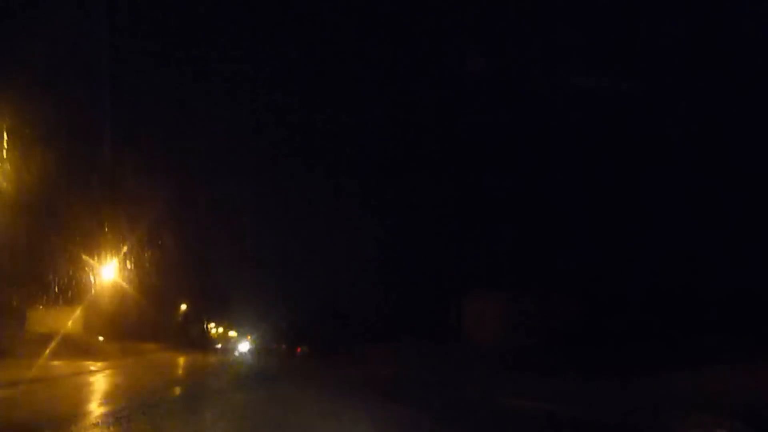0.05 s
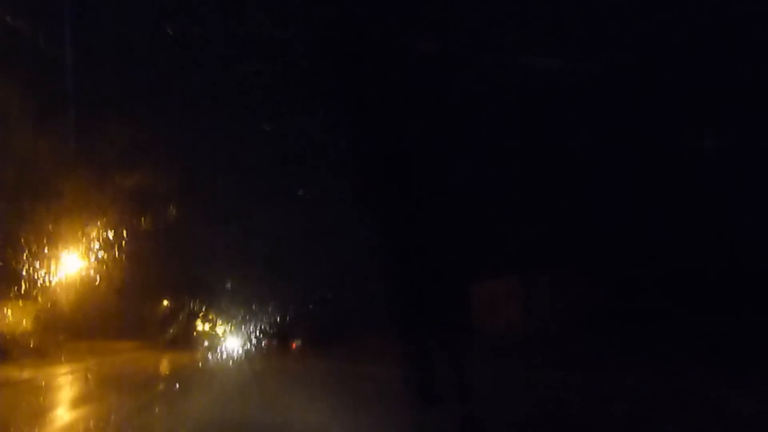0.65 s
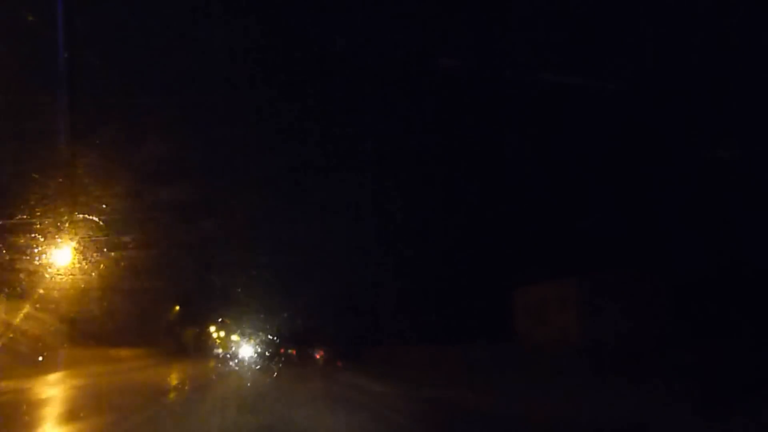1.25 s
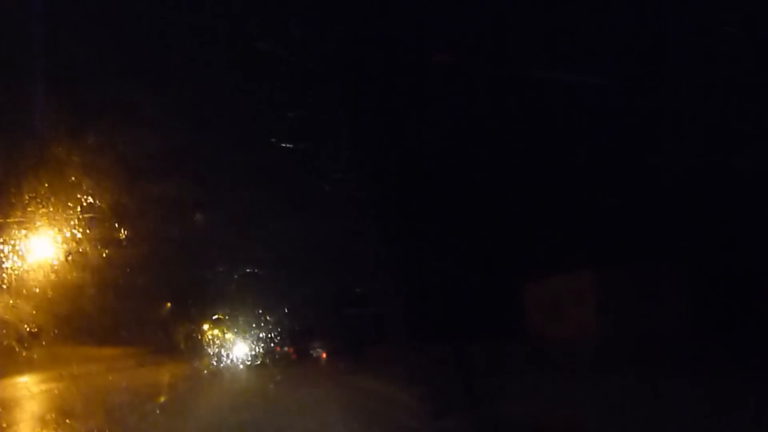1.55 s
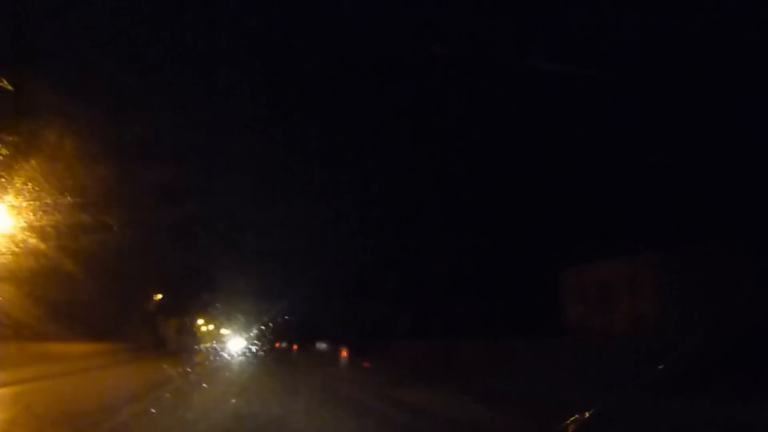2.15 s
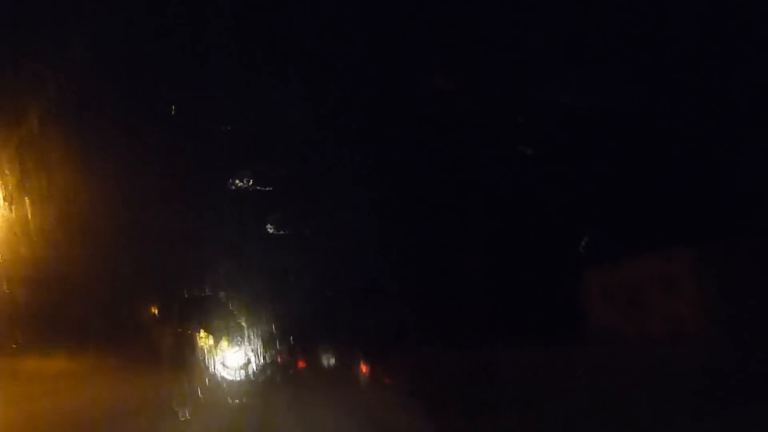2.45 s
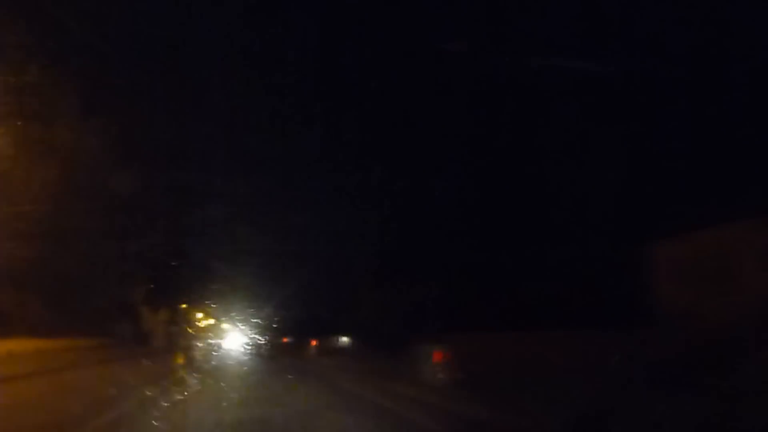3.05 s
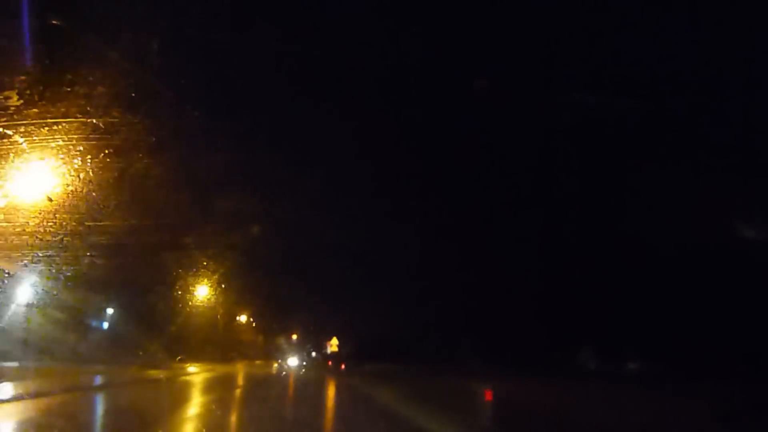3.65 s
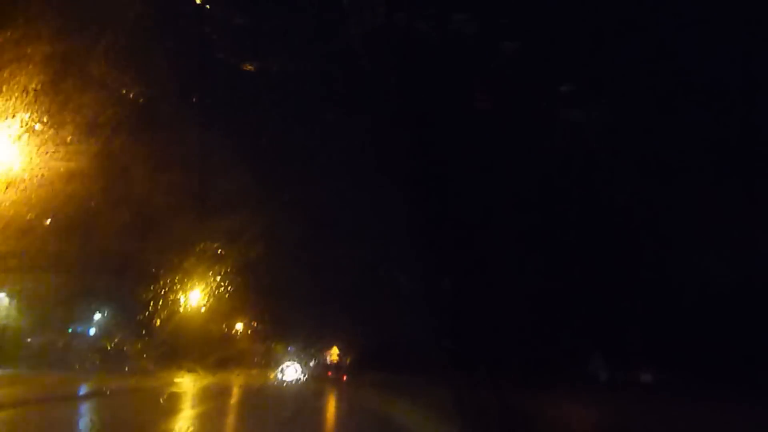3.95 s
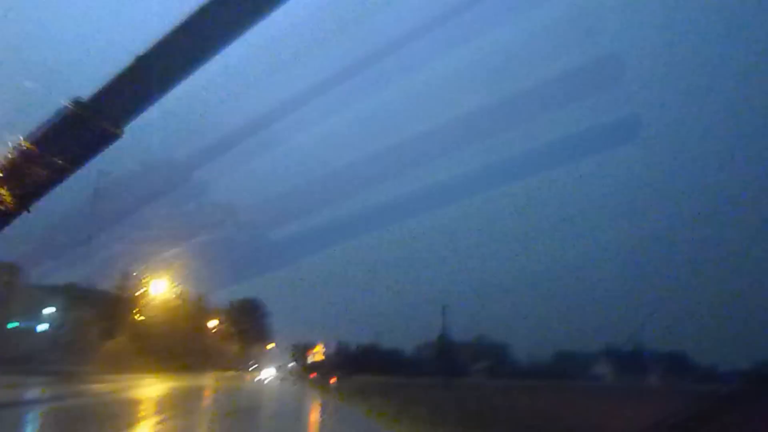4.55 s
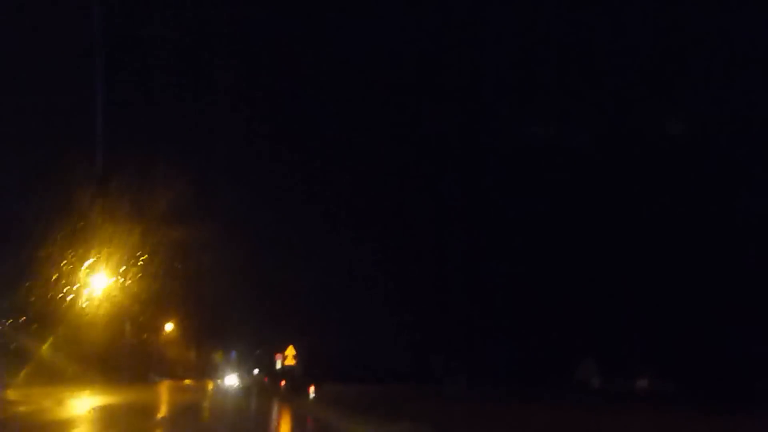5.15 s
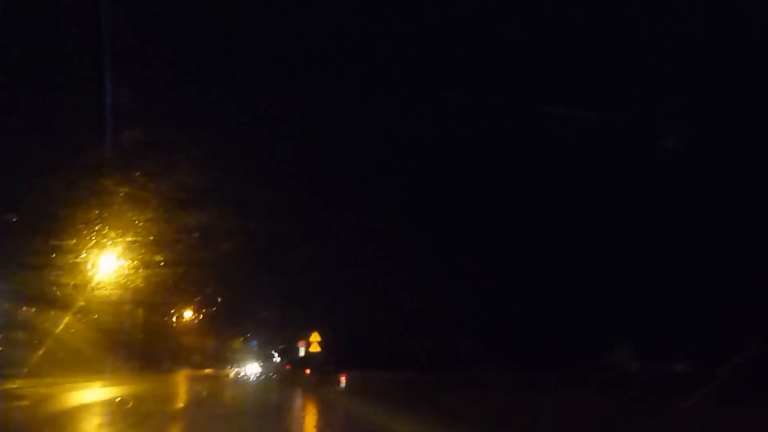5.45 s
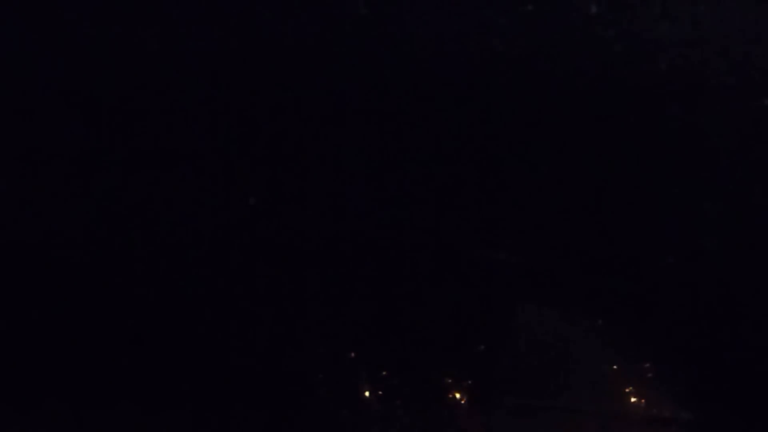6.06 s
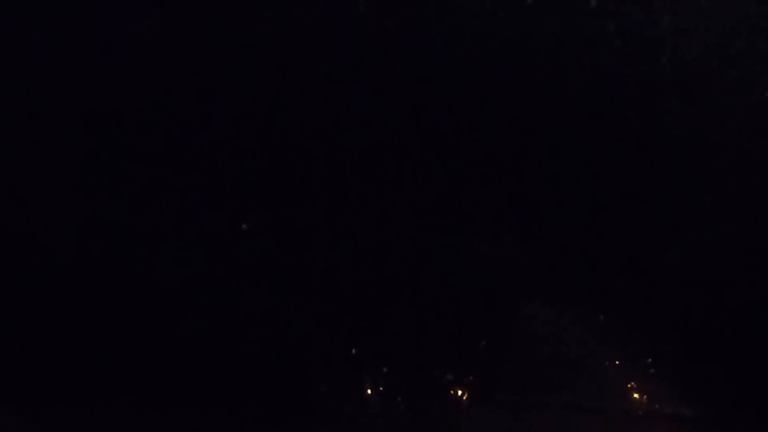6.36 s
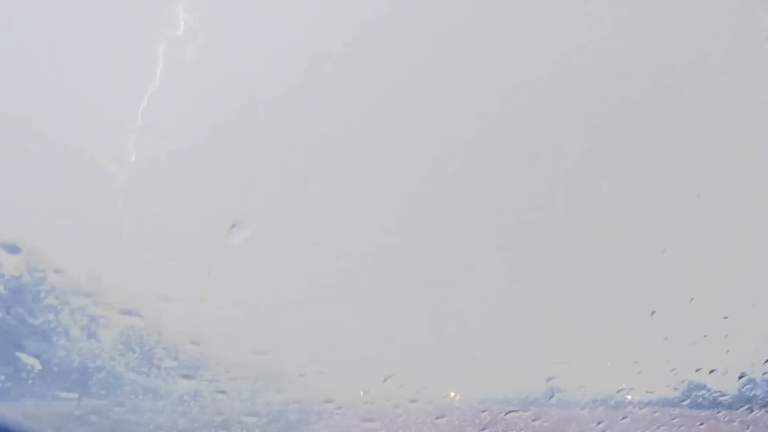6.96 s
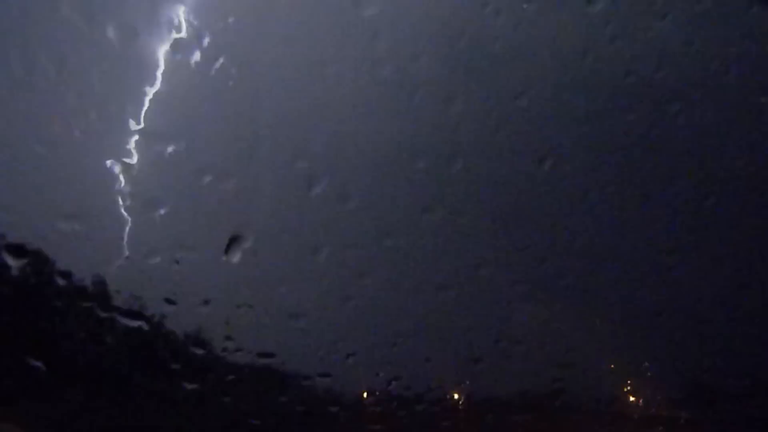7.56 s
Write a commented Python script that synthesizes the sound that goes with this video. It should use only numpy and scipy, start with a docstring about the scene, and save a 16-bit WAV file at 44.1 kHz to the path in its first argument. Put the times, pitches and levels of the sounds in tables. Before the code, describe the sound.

Inside a car, a downpour drums over tyre rumble and a droning engine, switching abruptly to softer rain tapping the parked car.

```python
"""Downpour inside a car.

First the car drives: drops hammer the windscreen and roof over the rumble of tyres on the
wet road and a slowly quickening engine, whose octave booms in the cabin's air resonance.
Then the scene cuts to a standing car, where lighter rain patters on the roof and glass.
Each drop is a brief crack of a panel followed by the cabin's short answer."""
import sys
import numpy as np
from scipy import signal
from scipy.fft import rfft, irfft, next_fast_len
from scipy.io import wavfile
from scipy.ndimage import map_coordinates

SR = 44100
rng = np.random.default_rng(int(sys.argv[2]) if len(sys.argv) > 2 else 0)


def file_out(sig):
    """Save sig as 16-bit WAV at sys.argv[1]."""
    # one column per channel
    cols = np.atleast_2d(sig).T
    # limit, then scale
    lim = np.clip(cols, -1, 1)
    pcm = np.round(lim * 32767).astype(np.int16)
    wavfile.write(sys.argv[1], SR, pcm)


N = 343539


def amp(db):
    """Decibels to gain."""
    return 10 ** (np.asarray(db) / 20)


def unit(x):
    """Scale to rms 1."""
    return x / np.sqrt(np.mean(x ** 2) + 1e-20)


def along(points, hz):
    """(Hz, value) points read on a log axis."""
    points_hz, values = np.transpose(points)
    return np.interp(np.log(hz + 1), np.log(points_hz + 1), values)


def curves(rows):
    """One value per sample for each column after the time."""
    times_s, *columns = np.transpose(rows)
    return [np.interp(np.arange(N) / SR, times_s, column) for column in columns]


def wobble(rate_hz):
    """Smooth random curve, rate_hz knots a second."""
    knots = rng.standard_normal(int(N * rate_hz / SR) + 4)
    return map_coordinates(knots, [np.arange(N) * rate_hz / SR])


def swells(rows):
    """Sum of bell curves. Each row: centre in seconds, half-width in seconds, height."""
    t = np.arange(N) / SR
    return sum(height * np.exp(-((t - at_s) / width_s) ** 2) for at_s, width_s, height in rows)


def filtered(x, response):
    """Apply a complex frequency response."""
    n = x.shape[-1]
    size = 2 * next_fast_len(n // 2 + SR // 20)
    return irfft(rfft(x, size) * response(np.fft.rfftfreq(size, 1 / SR)), size)[..., :n]


def coloured(x, spectrum):
    """Causal filter through (Hz, dB) points, so attacks stay sharp."""
    def response(hz):
        cepstrum = irfft(np.log(amp(along(spectrum, hz))))
        half = len(cepstrum) // 2
        return np.exp(rfft(np.r_[cepstrum[0], 2 * cepstrum[1:half]], 2 * half))
    return filtered(x, response)


# Stereo width in the cabin. Each row: frequency in Hz, side minus mid in dB.
CABIN_WIDTH = [(60, -28), (170, -33), (350, -24), (700, -14.7), (1400, -7), (2300, -2), (3300, -2.2),
               (5000, -3.6), (7000, -6.5), (9500, -10)]


def stereo(pair):
    """Two unrelated signals become left and right: alike in the bass, apart in the treble."""
    def mid_side_gains(hz):
        angle = np.arctan(amp(along(CABIN_WIDTH, hz)))
        return np.array([np.cos(angle), np.sin(angle)])
    mid, side = filtered(pair, mid_side_gains)
    return np.array([mid + side, mid - side])


def impact(crack_t60_s, cabin_t60_s, cabin_db):
    """One drop at one spot: the panel cracks in its own register, the cabin answers briefly."""
    t = np.arange(SR // 10) / SR
    envelope = amp(-60 * t / crack_t60_s) + amp(cabin_db - 60 * t / cabin_t60_s)
    tint = [(hz, 2.1 * rng.normal()) for hz in (1300, 2000, 2800, 3900, 5600)]
    ring = coloured(rng.standard_normal((2, len(t))) * envelope, tint)
    return ring / np.linalg.norm(ring)


def rain(per_s, spread_db, spots=40, **decay):
    """Drops of random size fall at random times on the spots of a panel."""
    falls = rng.random(N) < per_s / SR
    sizes = amp(spread_db * np.minimum(rng.standard_normal(N), 2.4))
    landing_spot = rng.integers(spots, size=N)
    patter = np.zeros((2, N))
    for spot in range(spots):
        hits = falls * sizes * (landing_spot == spot)
        patter += signal.oaconvolve(hits[None], impact(**decay), axes=1)[:, :N]
    return stereo(patter - patter.mean(axis=1, keepdims=True))


def fat_drops(rows, colour, focus_db, attack_s, **decay):
    """Single large drops, each ringing around its own pitch; level is rms over attack_s."""
    out = np.zeros((2, N + SR))
    for start_s, hz, db in rows:
        focus = [(hz / 2, -focus_db), (hz, 0), (hz * 2, -focus_db), (hz * 4, -2 * focus_db)]
        hit = coloured(colour(stereo(impact(**decay))), focus)
        attack_rms = hit[:, :round(attack_s * SR)].std()
        out[:, round(start_s * SR):][:, :hit.shape[1]] += amp(db) * hit / attack_rms
    return out[:, :N]


# Road noise spectra. Each row: frequency in Hz, relative density in dB.
SHAKE_SPECTRUM = [(10, -5), (22, -0.5), (35, -7.5), (52, 3), (75, -2), (110, -0.5), (400, -100)]
TYRE_SPECTRUM = [(55, -26.5), (85, -5.5), (105, 0.5), (150, 6.5), (180, -1), (230, -3.5), (290, -1),
                 (400, -5), (520, -13), (900, -16.5), (3000, -110)]
THUD_SPECTRUM = [(30, -21), (60, 0), (95, 3.5), (125, 4.5), (160, -7), (260, -3.5), (500, -54),
                 (2000, -110)]
SURGE_SPECTRUM = [(120, -32), (200, -3.5), (285, 2.5), (340, -1.5), (420, -9.5), (600, -22.5), (1500, -77)]
# Patches of road. Each row: centre in seconds, half-width in seconds, level in dB.
ROUGH_PATCHES = [(3.05, .06, -21.5), (3.135, .025, -24), (4.26, .015, -21), (4.42, .05, -23),
                 (4.53, .035, -23), (4.95, .025, -22), (5.8, .04, -26)]
WET_PATCHES = [(3.42, .07, -30), (3.6, .08, -30), (4.48, .06, -27), (4.9, .06, -31.5), (5.3, .06, -30),
               (5.7, .12, -31.5)]


def road():
    """Body shake and tyre roar grow with speed; rough patches thud and wet ones surge."""
    def rumble(spectrum):
        return unit(coloured(stereo(rng.standard_normal((2, N))), spectrum))

    def bursts(rows):
        return swells([(at_s, width_s, amp(db)) for at_s, width_s, db in rows])

    pace = speed()
    shake = amp(-34 + 3.5 * pace + 2.3 * wobble(5.01)) * rumble(SHAKE_SPECTRUM)
    roar = amp(-28.5 + 2.5 * pace + 1.2 * wobble(12)) * rumble(TYRE_SPECTRUM)
    thuds = bursts(ROUGH_PATCHES) * rumble(THUD_SPECTRUM)
    surges = bursts(WET_PATCHES) * rumble(SURGE_SPECTRUM)
    return shake + roar + thuds + surges


# Firing tone. Each row: time in seconds, firing rate in Hz, level in dB.
FIRING_TONE = [(0, 63.14, -28), (0.8, 62.9, -25), (1.7, 63.92, -27.5), (3.1, 64.94, -28),
               (3.28, 67.36, -31), (3.45, 68.73, -26.5), (4.1, 70.06, -28.5), (4.5, 69.75, -29),
               (5.85, 69.86, -26.5)]
# Weak engine orders. Each row: multiple of the firing rate, dB at lowest speed, dB at full speed.
WEAK_ORDERS = [(.5, -48, -45), (1.5, -55, -43), (3, -41, -36.5), (4, -45.5, -38), (4.23, -48.5, -38)]
# Swells and sags of the boom. Each row: centre in seconds, half-width in seconds, gain in dB.
BOOM_SWINGS = [(.03, .06, -5), (.26, .08, 5), (.7, .2, 2.5), (1.12, .1, 2.5), (2.7, .035, 5),
               (2.82, .04, -4), (3.26, .06, -6), (3.45, .09, 3), (3.64, .09, 4), (4.02, .055, 8),
               (4.16, .04, -5)]


def engine(cabin_hz=130.3, cabin_width_hz=11.6, boom_db=-27):
    """The firing tone hums; its octave booms until it climbs out of the cabin's air resonance."""
    firing_hz, firing_db = curves(FIRING_TONE)
    pace = speed()
    phase = 2 * np.pi * np.cumsum(firing_hz) / SR

    def order(multiple, db, roughness):
        flutter = 1 + roughness * (wobble(12) + 1j * wobble(12))
        return -np.sqrt(2) * amp(db) * np.real(flutter * np.exp(1j * multiple * phase))

    detuning = (2 * firing_hz - cabin_hz) / (cabin_width_hz / 2)
    octave_db = boom_db - 10 * np.log10(1 + detuning ** 2) + swells(BOOM_SWINGS)
    hum = order(1, firing_db, roughness=.21)
    boom = order(2, octave_db, roughness=.2 + .25 * pace)
    weak = sum(order(multiple, slow_db + pace * (fast_db - slow_db), roughness=.29)
               for multiple, slow_db, fast_db in WEAK_ORDERS)
    return hum + boom + weak


def speed():
    """The car's pace follows the engine: 0 at its slowest, 1 at full speed."""
    firing_hz, _ = curves(FIRING_TONE)
    return (firing_hz - firing_hz.min()) / np.ptp(firing_hz)


# Drops ringing on the bodywork. Each row: start in seconds, pitch in Hz, peak in dB.
STEEL_PLINKS = [(6.122, 2750, -40), (6.213, 1620, -31.5), (6.59, 2950, -40), (6.693, 2900, -42),
                (7.127, 2930, -38.5), (7.407, 1450, -34), (7.445, 2650, -39), (7.607, 2720, -38)]


def plinks(t60_s):
    """Each drop wakes one short-lived mode of the thin steel."""
    out = np.zeros((2, N + SR))
    t = np.arange(SR // 8) / SR
    for start_s, hz, db in STEEL_PLINKS:
        channel_phase = rng.normal(0, .28, (2, 1))
        ring = amp(db - 60 * t / t60_s) * np.sin(2 * np.pi * hz * t + channel_phase)
        out[:, round(start_s * SR):][:, :len(t)] += ring
    return out[:, :N]


# Roof and cabin modes. Each row: centre in Hz, bandwidth in Hz, gain in dB.
ROOF_MODES = [(66, 6, 2), (184, 40, 1.5), (329, 43, 6), (490, 76, 5.5), (702, 116, 3), (1095, 150, -3),
              (1396, 100, 2), (1627, 86, 2), (2520, 460, -4.5), (4800, 1770, -17)]


def roof_panel(x):
    """The roof and the cabin under it ring in modes of alternating sign."""
    def response(hz):
        return sum((-1) ** k * amp(db) * 1j * hz * width_hz / (mode_hz**2 - hz**2 + 1j * hz * width_hz)
                   for k, (mode_hz, width_hz, db) in enumerate(ROOF_MODES))
    return filtered(x, response)


# Rain strength, car standing. Each row: time in seconds, roof and windscreen in relative dB.
SHOWER_STRENGTH = [(5.9, -39, -45), (6.4, -41, -48.5), (6.8, -39.5, -48), (7.79, -41, -48)]
# Panel spectra, car standing. Each row: frequency in Hz, relative density in dB.
SHOWER_ROOF_SPECTRUM = [(22, -32), (35, -13), (45, -20), (64, -0.5), (85, -10), (120, -5), (177, -1),
                        (216, -7), (330, -3.5), (389, -8), (523, -5.5), (626, -11), (800, -5.5), (989, -10),
                        (1590, -16), (2000, -13.5), (2600, -46), (4400, -120)]
SHOWER_GLASS_SPECTRUM = [(400, -23), (1300, -10), (1900, -1), (2200, -1.5), (2700, 0.5), (3000, -7),
                         (3250, -6.5), (4500, -11), (6000, -10.5), (7200, -23), (9000, -32), (11000, -40)]
# Fat drops on the roof. Each row: start in seconds, pitch in Hz, level in dB.
ROOF_PLOPS = [(5.945, 1400, -41.5), (5.983, 800, -39), (6.029, 850, -37), (6.064, 500, -39),
              (6.117, 900, -38.5), (6.241, 600, -35.5), (6.49, 480, -39), (6.555, 800, -36),
              (6.671, 220, -40), (6.689, 270, -39), (6.835, 480, -36.5), (7.275, 1050, -40.5),
              (7.391, 680, -36), (7.445, 300, -40), (7.541, 750, -35), (7.567, 700, -37)]


def shower():
    """On the standing car the drops are fewer and softer, and the roof's resonances come through."""
    roof_db, glass_db = curves(SHOWER_STRENGTH)
    taps = rain(per_s=700, spread_db=3, crack_t60_s=.024, cabin_t60_s=.11, cabin_db=-5)
    wash = rain(per_s=1500, spread_db=.5, crack_t60_s=.019, cabin_t60_s=.1, cabin_db=-5)
    ticks = rain(per_s=900, spread_db=4, crack_t60_s=.008, cabin_t60_s=.06, cabin_db=-10)
    roof_ring = amp(roof_db - 1.5) * unit(roof_panel(taps))
    roof_wash = amp(roof_db - 1) * unit(coloured(wash, SHOWER_ROOF_SPECTRUM))
    glass = amp(glass_db - 1.5) * unit(coloured(ticks, SHOWER_GLASS_SPECTRUM))
    plops = fat_drops(ROOF_PLOPS, roof_panel, focus_db=11, attack_s=.015,
                      crack_t60_s=.024, cabin_t60_s=.09, cabin_db=-9)
    return roof_ring + roof_wash + glass + plops + plinks(t60_s=.055)


# Lulls in the rain. Each row: centre in seconds, loss in dB.
RAIN_LULLS = [(.15, 5), (.29, 3.5), (.92, 2), (1.34, 0.5), (1.875, 3.5), (2.66, -1), (2.811, 3), (3.02, 2),
              (3.305, 4), (3.8, 6), (4.11, 3.5), (4.54, 3.5), (5.01, 5), (5.42, 2)]


def lull_loss_db(width_s=.022):
    """The rain falls away briefly in each lull."""
    return swells([(at_s, width_s, db) for at_s, db in RAIN_LULLS])


# Prominent spray ticks. Each row: start in seconds, relative level in dB.
SPRAY_BURSTS = [(.0938, -38), (.221, -41), (.63, -41), (.864, -40), (1.0421, -42), (1.23, -42),
                (1.7171, -42), (1.8109, -40), (1.957, -39), (3.4377, -41), (3.4646, -41), (3.6043, -41),
                (4.4135, -41), (4.4564, -42), (4.5611, -41), (5.1897, -41), (5.8312, -41)]
# Spray spectrum. Each row: frequency in Hz, relative density in dB.
SPRAY_SPECTRUM = [(1500, -40), (3500, -10), (5200, 0), (6300, -2), (7200, -6), (9000, -10), (11000, -18),
                  (13000, -24)]


def spray(tick_hz=6500):
    """Fast drops burst on the windscreen with tiny bright ticks: a few stand out, the rest prickle."""
    _, glass_db = curves(DOWNPOUR_STRENGTH)
    bright = lambda x: coloured(x, SPRAY_SPECTRUM)
    drops = rain(per_s=250, spread_db=3.5, spots=12, crack_t60_s=.004, cabin_t60_s=.03, cabin_db=-22)
    prickle = amp(glass_db - 21 - lull_loss_db()) * unit(bright(drops))
    bursts = [(start_s, tick_hz, db) for start_s, db in SPRAY_BURSTS]
    ticks = fat_drops(bursts, bright, focus_db=2, attack_s=.002,
                      crack_t60_s=.007, cabin_t60_s=.03, cabin_db=-20)
    return prickle + amp(1) * ticks


# Fat drops on the glass. Each row: start in seconds, pitch in Hz, relative level in dB.
GLASS_SPLATS = [(.042, 3800, -27), (.0936, 4200, -26.5), (.2208, 2500, -21.5), (.2554, 2400, -24.5),
                (.3627, 2900, -21.5), (.4972, 3800, -23), (.6301, 3100, -24.5), (.742, 2500, -26),
                (.8073, 4100, -26.5), (.8365, 2800, -23.5), (.8618, 2900, -20), (1.0421, 4800, -28),
                (1.1048, 3400, -21.5), (1.1968, 3300, -26), (1.314, 4400, -26.5), (1.3858, 1900, -28),
                (1.8159, 2700, -26.5), (1.9573, 4800, -25.5), (2.2065, 2900, -26), (2.365, 5000, -28.5),
                (2.4733, 3900, -27.5), (2.7044, 2300, -27.5), (2.7635, 2000, -27), (2.9256, 2400, -25.5),
                (2.956, 3500, -27.5), (3.1278, 3200, -29.5), (3.2696, 2300, -25.5), (3.7197, 3300, -24),
                (4.4565, 3900, -25), (4.561, 3400, -27), (4.6813, 2500, -28.5), (4.7053, 3200, -28),
                (4.8614, 2500, -26), (5.107, 3900, -31), (5.2936, 2700, -27), (5.8315, 5200, -28),
                (5.8482, 5200, -29.5), (5.8642, 2800, -30.5), (5.947, 3600, -40), (6.0298, 2900, -39.5),
                (6.1186, 2400, -40), (6.174, 4200, -43), (6.2413, 2200, -41.5), (6.2917, 4400, -44.5),
                (6.4858, 2000, -43), (6.5017, 2400, -43), (6.5563, 3400, -36), (6.5691, 2800, -40.5),
                (6.6913, 2200, -41.5), (6.7207, 2500, -43), (6.8395, 2500, -43), (6.939, 4500, -44),
                (7.2136, 3500, -43.5), (7.3423, 2000, -44), (7.4062, 3000, -42), (7.4456, 4200, -41),
                (7.541, 3400, -41), (7.632, 4500, -44.5), (7.714, 2200, -43)]


def splats(splash_delay_s=.008, splash_loss_db=7.5):
    """Fat drops smack the windscreen, moving or standing; part of each splashes down again."""
    glass = lambda x: coloured(x, WINDSCREEN_SPECTRUM)
    scatter = rng.random((len(GLASS_SPLATS), 2))
    splashes = [(start_s + splash_delay_s * (.5 + late), hz * 2 ** (up - .5), db - splash_loss_db)
                for (start_s, hz, db), (late, up) in zip(GLASS_SPLATS, scatter)]
    return amp(-.5) * fat_drops(GLASS_SPLATS + splashes, glass, focus_db=7, attack_s=.0035,
                                crack_t60_s=.021, cabin_t60_s=.06, cabin_db=-16)


# Rain strength, car moving. Each row: time in seconds, roof and windscreen in relative dB.
DOWNPOUR_STRENGTH = [(0, -27, -31), (0.72, -27.5, -30.5), (1.0, -29.5, -33), (1.45, -30.5, -34.5),
                     (2.2, -29.5, -33), (2.65, -31.5, -34.5), (3.55, -29, -34.5), (4.15, -30.3, -35.5),
                     (4.9, -31, -35), (5.3, -29, -34), (5.8, -30.0, -34)]
# Sheets of water slapping the car. Each row: centre in seconds, half-width in seconds, roof gain in dB.
WATER_SHEETS = [(.36, 0.044, 3), (1.12, 0.03, 4.5), (1.2, 0.028, 2.5), (1.72, 0.093, 2.5), (2.02, 0.087, 0),
                (2.46, 0.031, 2), (2.9, 0.023, 2), (3.1, 0.058, 0), (4.48, 0.037, 2.5), (5.28, 0.061, 1.5),
                (5.64, 0.07, 4)]
# Roof patter, deep roof drumming and glass spectra. Each row: frequency in Hz, relative density in dB.
ROOF_SPECTRUM = [(150, -46.5), (350, -0.5), (500, -0.5), (690, 3), (790, -2), (1050, -1), (1350, -2.5),
                 (1750, -5), (2300, -9), (4000, -39.5), (9000, -100)]
DRUM_SPECTRUM = [(90, -30.5), (165, -1.5), (260, -0.5), (370, -1), (520, -4.5), (1000, -45)]
WINDSCREEN_SPECTRUM = [(300, -49), (1000, -7.5), (1700, -6.5), (2200, -2.5), (2700, -0.5), (3600, -2.5),
                       (4500, -3), (5400, -6.5), (6300, -12), (7200, -19), (9000, -30), (11000, -39)]


def downpour(drum_db_per_rain_db=3.25, glass_sheet_share=.38):
    """The moving car runs into sheets of rain: dense drumming above, sharp spatter in front."""
    roof_rain_db, glass_rain_db = curves(DOWNPOUR_STRENGTH)
    patter = rain(per_s=2500, spread_db=2, crack_t60_s=.0092, cabin_t60_s=.085, cabin_db=-13.5)
    spatter = rain(per_s=2300, spread_db=4.7, crack_t60_s=.006, cabin_t60_s=.05, cabin_db=-13)
    sheets_db = swells(WATER_SHEETS)
    gusts_db = .46 * wobble(12) - lull_loss_db()
    clumps_db = wobble(35)  # drops arrive in clumps
    thumps = rain(per_s=600, spread_db=2, crack_t60_s=.017, cabin_t60_s=.091, cabin_db=-15)
    easing_db = roof_rain_db - roof_rain_db.max()
    roof_db = roof_rain_db - 1.5 + sheets_db + gusts_db + .41 * clumps_db
    drum_db = -30.5 + drum_db_per_rain_db * easing_db + sheets_db + gusts_db
    glass_db = glass_rain_db + 2 + glass_sheet_share * sheets_db + gusts_db + clumps_db
    roof = amp(roof_db) * unit(coloured(patter, ROOF_SPECTRUM))
    drum = amp(drum_db) * unit(coloured(thumps, DRUM_SPECTRUM))
    glass = amp(glass_db) * unit(coloured(spatter, WINDSCREEN_SPECTRUM))
    return roof + drum + glass


def scene(cut_s=5.883, fade_s=.002):
    """The drive, then an abrupt cut to the standing car, where the rain leans slightly right."""
    moving = np.clip((cut_s - np.arange(N) / SR) / fade_s, 0, 1)
    driving = amp([[.08], [-.08]]) * (engine() + road() + downpour() + spray())
    standing = amp([[-.35], [.35]]) * shower()
    return moving * driving + (1 - moving) * standing + splats()


# Treble notch and roll-off. Each row: frequency in Hz, gain in dB.
TREBLE_RESPONSE = [(7000, 0), (7450, -4), (7800, -17), (8050, -21), (8400, -6), (9000, 0), (11000, 0),
                   (12300, -8), (13400, -22)]


def record(dry):
    """The left channel leads slightly; the top treble is dulled and ends at a band limit."""
    lead_s, limit_hz = np.array([[.55], [0]]) / SR, 13400

    def response(hz):
        treble = amp(along(TREBLE_RESPONSE, hz)) * (hz < limit_hz)
        return treble * np.exp(2j * np.pi * hz * lead_s)
    return filtered(dry, response)


dry = scene()
out = record(dry)
file_out(out)
```